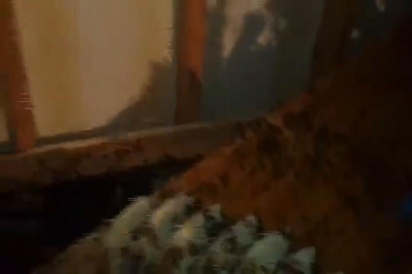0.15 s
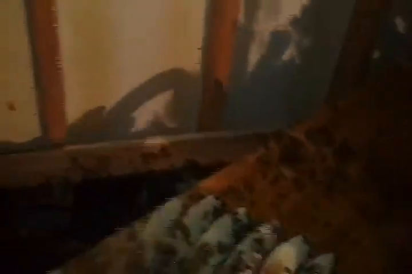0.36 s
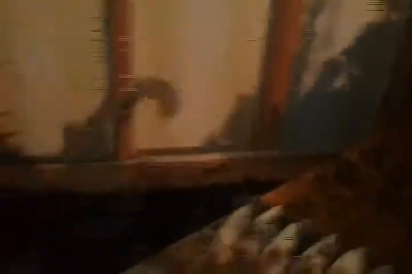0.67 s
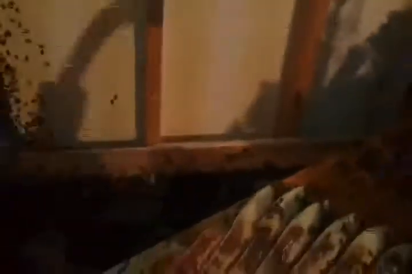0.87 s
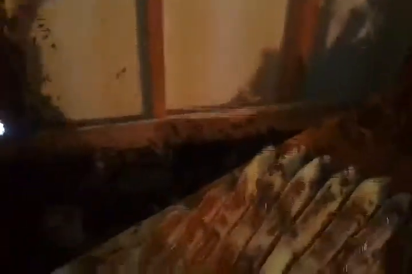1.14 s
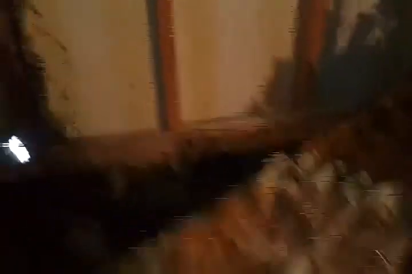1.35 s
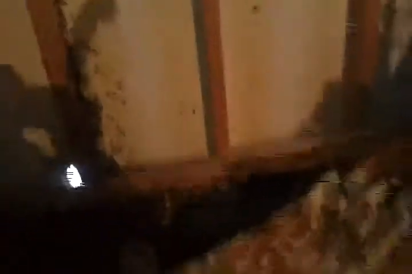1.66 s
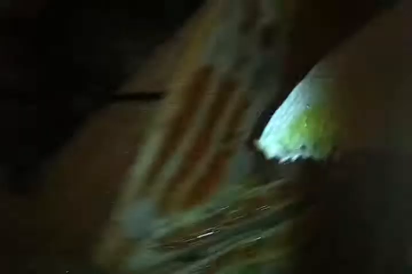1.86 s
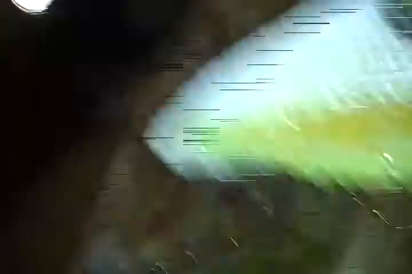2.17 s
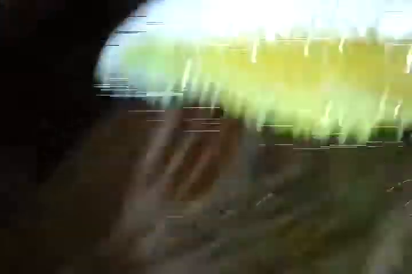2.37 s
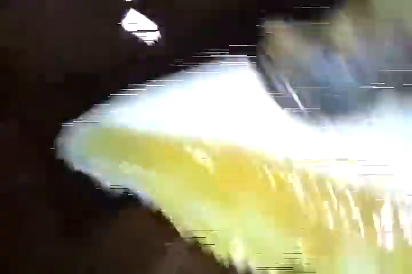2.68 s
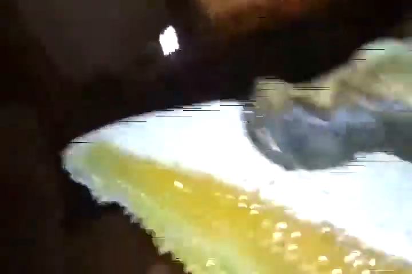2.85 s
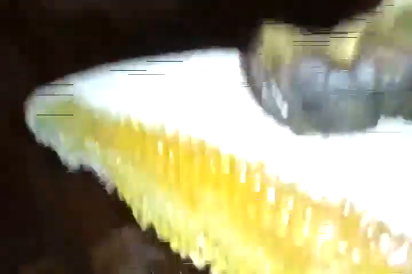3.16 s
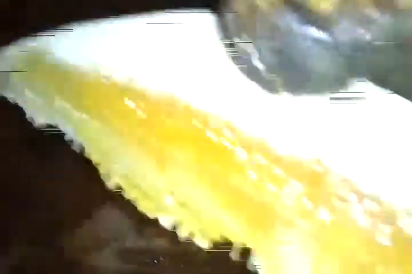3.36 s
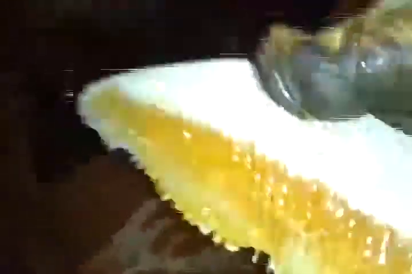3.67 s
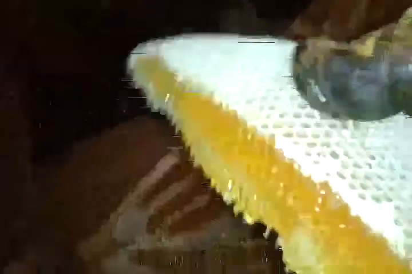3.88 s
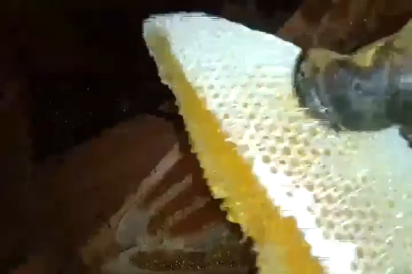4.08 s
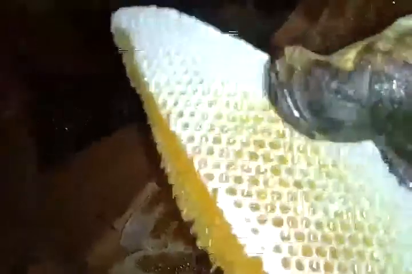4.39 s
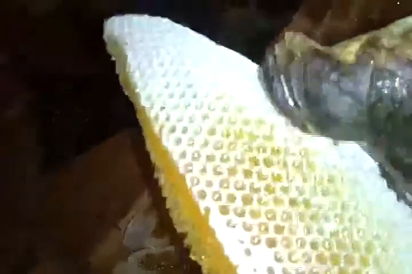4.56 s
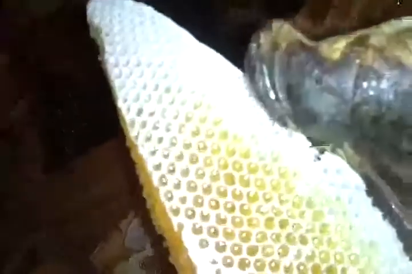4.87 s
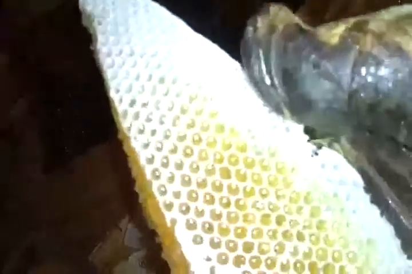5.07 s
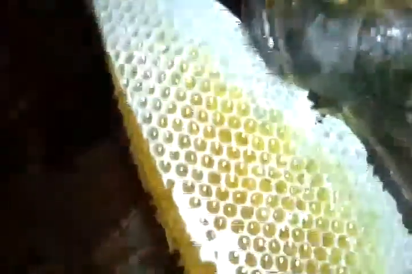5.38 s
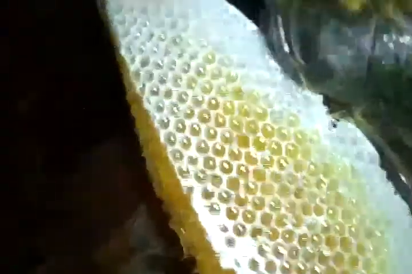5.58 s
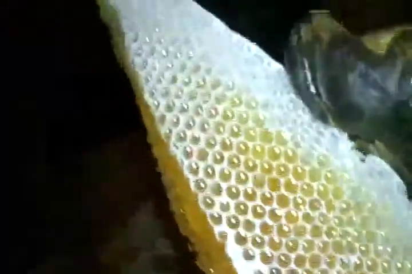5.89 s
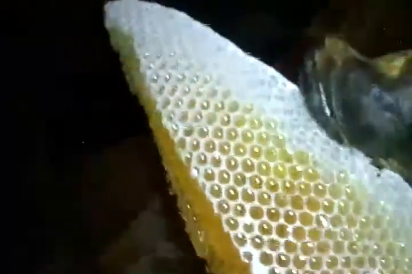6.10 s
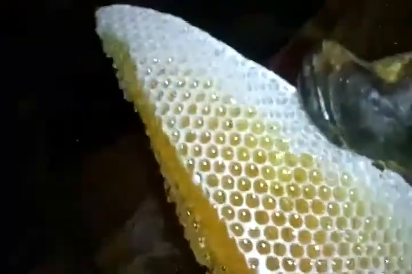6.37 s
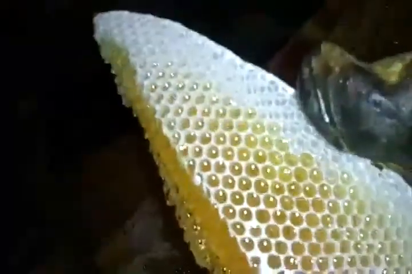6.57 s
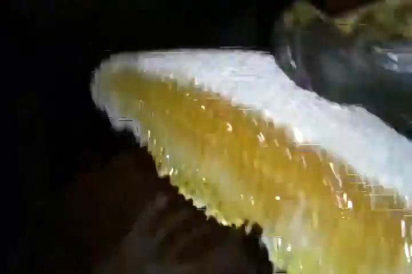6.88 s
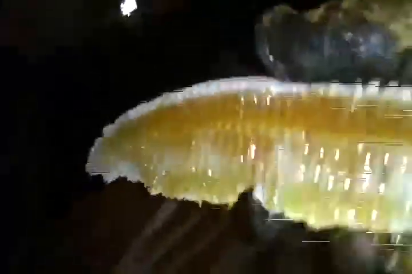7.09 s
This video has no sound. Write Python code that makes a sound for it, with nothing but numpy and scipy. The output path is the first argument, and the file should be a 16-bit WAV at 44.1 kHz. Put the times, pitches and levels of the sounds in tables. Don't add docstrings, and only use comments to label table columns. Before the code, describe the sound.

Loud rushing suction through a corrugated hose with brief whistles, a sudden silence, then steadier roar and motor whine, cut once for an instant.

```python
import sys
import numpy as np
from scipy import signal
from scipy.io import wavfile
from scipy.ndimage import uniform_filter1d

SR = 44100
rng = np.random.default_rng(int(sys.argv[2]) if len(sys.argv) > 2 else 0)


def waveform_to_disk(signal):
    frames = np.transpose(np.atleast_2d(signal))
    scaled = np.clip(frames, -1, 1) * 32767
    samples = np.round(scaled).astype(np.int16)
    wavfile.write(sys.argv[1], SR, samples)


def to_linear_factor(level_db):
    exponent = np.asarray(level_db, float) / 20
    return 10 ** exponent


N = 319267

MOVE_S = 2.3


def read(points, hz):
    f, value = np.transpose(points)
    return np.interp(np.log(hz + 1), np.log(f + 1), value)


def evened(x):
    return x / np.sqrt(np.mean(x ** 2) + 1e-20)


def drift(per_s):
    t = np.arange(0, N, 256) / SR
    rates = np.geomspace(per_s / 20, per_s, 16)
    slow = sum(np.sin(2 * np.pi * (f * t + rng.random())) / np.sqrt(f) for f in rates)
    return np.interp(np.arange(N) / SR, t, evened(slow))


def by_place(t, first, second):
    return np.where(t < MOVE_S, first, second)


def bell(t, middle_s, length_s):
    return np.exp(-((2 * (t - middle_s) / length_s) ** 2) ** 2)


def bump(hz, centre_hz, width_hz):
    return 1 / (1 + (2 * (hz[:, None] - centre_hz) / width_hz) ** 2)


# (frequency [Hz], width [Hz], early level over the rush [dB], late level [dB])
FIRST_HOSE = [(95, 14, -1.5, -4), (152, 25, -2, -0.5), (218, 25, 1.5, 3), (270, 17, 7, 1.5),
              (370, 55, 4.5, 1), (450, 50, -1, 0), (605, 30, 3, 1.5), (695, 22, 5, 0), (746, 30, -2, -3.5),
              (775, 25, 0, 2), (1120, 40, -3.5, -5.5), (1185, 19, 7, 0.5), (1250, 41, 0.5, -2.5),
              (1554, 110, 4, 4), (1910, 40, 1.5, 4), (2100, 120, -1, 1), (2300, 80, 5, 0.5),
              (2420, 60, -1, 1.5), (2480, 50, 1.5, 3), (2820, 150, 1, 1), (3100, 300, -7.5, -6),
              (3940, 170, 5.5, 5), (4100, 73, -1, -3.5), (4740, 220, -1.5, 0.5)]
SWING_S = 0.61, 1.1


def swinging_hose(t, hz):
    swung = np.interp(t, SWING_S, (0, 1))
    return sum(bump(hz, f, w) * (early + (late - early) * swung) for f, w, early, late in FIRST_HOSE)


def hose_moan(t, hz):
    moan_hz = 375 - 14 * np.cos(2 * np.pi * 4.3 * (t - .14))
    moan_db = np.interp(t, (.35, .65), (7.5, 0))
    return bump(hz, moan_hz, 28) * moan_db


# (middle [s], length [s], frequency [Hz], level over the rush [dB])
HOSE_WHISTLES = [
    (.42, .3, 2270, 4.5),
    (0.478, .15, 1570, 4.5),
    (0.759, .2, 3915, 4.5),
    (.85, .25, 2110, 4.5),
    (1.081, .15, 2420, 6.5),
    (1.217, .2, 2100, 5),
    (1.402, .2, 1890, 3),
    (1.551, .2, 2550, 7),
    (1.7, .3, 1587, 5),
    (1.78, .15, 1860, 4.5),
]


def hose_whistles(t, hz):
    return sum(bump(hz, f, 23) * db * bell(t, s, length) for s, length, f, db in HOSE_WHISTLES)


# (frequency [Hz], width [Hz], level over the rush [dB])
SECOND_HOSE = [(33, 12, 3.5), (61, 12, 3.5), (95, 20, -2.5), (211, 31, 4), (276, 36, -4.5), (330, 65, 4.5),
               (430, 21, -8), (442, 22, 3.5), (580, 30, 3), (625, 25, -2), (745, 32, -4.5), (812, 60, 2),
               (980, 70, -2.5), (1050, 27, 3), (1120, 47, -7), (1250, 60, -2.5), (1506, 40, 6),
               (1574, 30, 5), (1596, 33, -3), (1681, 37, 8), (1780, 40, 1.5), (1844, 55, -5), (1897, 32, 5),
               (2100, 50, -8), (2383, 27, -1), (2530, 350, 2.5), (3014, 160, -6), (3390, 60, 0.5),
               (3850, 400, 3.5), (6470, 340, 2.5)]


def resting_hose(hz):
    return sum(bump(hz, f, w) * db for f, w, db in SECOND_HOSE)


def colour(spectrum, hose_db, hz):
    comb = evened(uniform_filter1d(rng.standard_normal(len(hz)), size=3))
    gain = to_linear_factor((read(spectrum, hz) + 1.3 * comb)[:, None] + hose_db)
    middle_band = (hz > 600) & (hz < 3000)
    return gain / np.linalg.norm(gain[middle_band], axis=0)


# (frequency [Hz], density [dB per Hz])
FIRST_AIR = [(20, -10.5), (35, -12), (60, -12.5), (95, -17.5), (200, -16), (450, -19), (750, -24.5),
             (1200, -21), (2700, -20.5), (3400, -22.5), (5500, -25.5), (6700, -25.5), (7200, -33),
             (7600, -44.5)]
SECOND_AIR = [(20, -17), (35, -15), (60, -12.5), (95, -17.5), (200, -15.5), (450, -18), (750, -22.5),
              (1200, -22), (2700, -22.5), (3400, -24.5), (5500, -24.5), (6700, -25), (7200, -31.5),
              (7600, -42)]
RUSH_DB, RUMBLE_DB, HISS_DB = (-19.5, -21), (-6, -3.5), (-1.5, -2)
RUSH_GAIN_DB_PER_S = .5
GUST_DB, GUSTS_PER_S = 1.3, 6


def air():
    frames = N // 1024 + 5
    hz = np.fft.rfftfreq(4096, 1 / SR)
    t = np.arange(frames) * 1024 / SR
    real, imaginary, patches = rng.standard_normal((frames, 2049, 3)).T
    patches = uniform_filter1d(patches, size=28, axis=0)
    patches = evened(uniform_filter1d(patches, size=4, axis=1))

    rush_db = by_place(t, RUSH_DB[0] + RUSH_GAIN_DB_PER_S * (t - 1), RUSH_DB[1])
    gusts = np.interp(t, np.arange(N) / SR, drift(GUSTS_PER_S))
    rumble_db = by_place(t, *RUMBLE_DB) + GUST_DB * gusts
    hiss_db = by_place(t, *HISS_DB)
    low = 1 / (1 + (hz / 500) ** 4)
    high = 1 / (1 + (3000 / (hz + 1)) ** 8)
    tilt_db = np.outer(low, rumble_db + 2.0) + np.outer(high, hiss_db + 0.46)

    moving_db = swinging_hose(t, hz) + hose_moan(t, hz) + hose_whistles(t, hz)
    first = colour(FIRST_AIR, moving_db, hz)
    second = colour(SECOND_AIR, resting_hose(hz), hz)
    spectra = (real + 1j * imaginary) * by_place(t, first, second)
    spectra = spectra * to_linear_factor(rush_db + tilt_db + 0.71 * patches)
    rush = signal.istft(spectra, nperseg=4096, noverlap=3072)[1][:N]
    eddies = evened(uniform_filter1d(rng.standard_normal(N), size=300))
    return to_linear_factor(0.5) * to_linear_factor(0.35 * eddies) * rush


def tone(turns, db, waver_db, jitter):
    phase = turns + rng.random() + jitter * drift(15)
    return np.sqrt(2) * to_linear_factor(db + waver_db * drift(12)) * np.sin(2 * np.pi * phase)


WHISTLE_HZ = 177.5, 770, 2091, 3068, 5763
# (first place [dB], second place [dB])
WHISTLES = [
    (-36.5, -61),
    (-43, -62),
    (-58.5, -40.5),
    (-68, -42),
    (-68, -50.5),
]


def steady_whistles(t):
    return sum(tone(f * t, by_place(t, *db), 1.3, 0.04) for f, db in zip(WHISTLE_HZ, WHISTLES))


def mains_hum(t, mains, turns):
    hum = tone(mains, by_place(t, -30.5, -32), 1.8, 0.024)
    return hum + tone(2 * turns + mains, by_place(t, -55, -44), 1.5, .04)


# (shaft multiple, middle [s], length [s], lift [dB])
GLINTS = [(7, 1.5, .55, 6), (7, 1.56, .16, 5), (7, .85, .7, -4), (4, .3, .7, -5), (3, 3.6, 1.4, -3),
          (7, 2.65, .3, 7), (7, 5.3, .4, 3), (7, 6.6, .7, -2), (12, 2.85, .8, -9), (12, 6.6, .6, 2.5),
          (9, 1.55, .6, 5), (9, .5, 0.5, -5), (9, 3.6, .5, 8.5), (3, 2.1, .4, 7), (2, 3.8, .3, 2.5),
          (4, 3.7, .4, 4)]


def glint(k, t):
    return sum(db * bell(t, s, length) for order, s, length, db in GLINTS if round(order) == k)


# (shaft multiple, first place [dB], second place [dB])
WEAK_ORDERS = [(.25, -76.5, -35), (.375, -73, -37.5), (2, -35.5, -41), (3, -39.5, -38), (4, -35, -38),
               (5, -39, -46.5), (6, -46, -57.5), (8, -57, -41), (9, -40.5, -47), (11, -48, -41.5),
               (13, -64, -52.5), (14, -53, -69.5)]


def weak_orders(t, turns):
    out = np.zeros(N)
    for k, first_db, second_db in WEAK_ORDERS:
        order_db = by_place(t, first_db, second_db) + glint(round(k), t) - 1.5
        out += tone(k * turns, order_db, 3.0, 0.05)
    return out


def blade_orders(t, turns):
    seventh_db = by_place(t, -36, -35) + glint(7, t)
    twelfth_db = by_place(t, -42.5, -35.5) + glint(12, t)
    return tone(7 * turns, seventh_db, 1.7, 0.031) + tone(12 * turns, twelfth_db, 1.5, .04)


# (time [s], level [dB])
FACING = [(0, -32), (.45, -30.5), (.75, -25.5), (1.6, -23.5), (1.8, -28), (2.65, -28.5), (2.95, -23.5),
          (3.4, -27.5), (4.3, -28.5), (4.8, -26.5), (5.9, -29), (6.4, -25.5), (6.8, -27), (7.24, -28.5)]


def shaft_tone(t, mains, turns):
    shaft_db = np.interp(t, *np.transpose(FACING))
    return tone(turns, shaft_db, .8, 0.022) * (1 + 0.095 * np.sin(2 * np.pi * mains))


SHAFT_HZ = 530.2, 538.8
MAINS_HZ = 119.9


def motor():
    t = np.arange(N) / SR
    turns = np.cumsum(by_place(t, *SHAFT_HZ) + .15 * drift(1.5)) / SR
    mains = MAINS_HZ * t
    out = steady_whistles(t) + mains_hum(t, mains, turns)
    out += weak_orders(t, turns) + blade_orders(t, turns)
    return out + shaft_tone(t, mains, turns)


def scene():
    return (air() + motor())[None]


RAIL, OFFSET = .715, -.278


def overload(dry):
    room = np.where(dry < 0, RAIL + OFFSET, .62)
    return dry / (1 + (dry / room) ** 6) ** (1 / 6)


FADE_OUT_S, FADE_IN_S, FADE_IN_FROM = (1.832, 1.8755), (2.6532, 2.9), .19
FADE_OUT_BEND = 0.97
DROPOUT_S = 4.3713, 4.4723


def fader(t):
    fade_out = np.interp(t, FADE_OUT_S, (1, 0)) ** FADE_OUT_BEND
    fade_in = (t > FADE_IN_S[0]) * np.interp(t, FADE_IN_S, (FADE_IN_FROM, 1))
    return (fade_out + fade_in) * ((t < DROPOUT_S[0]) | (t > DROPOUT_S[1]))


# (frequency [Hz], level [dB])
MIRROR = [
    (7700, -6.5),
    (8300, -12.5),
    (8600, -28.5),
    (8900, -37.5),
    (9200, -57),
    (9500, -110),
]
SAMPLE_HZ = 16000


def low_rate(faded, gain, t):
    sampled = faded * (1 + 2 * np.cos(2 * np.pi * SAMPLE_HZ * t)) + OFFSET * gain
    hz = np.linspace(0, SR / 2, 513)
    taps = signal.firwin2(401, hz, to_linear_factor(read(MIRROR, hz)), fs=SR, window=("kaiser", 8))
    held = np.pad(sampled, ((0, 0), (200, 200)), "edge")
    return signal.oaconvolve(held, taps[None] / taps.sum(), "valid")


# (time [s], peak level [dB])
RAIL_CLICKS = [(1.2311, -52.5), (1.3234, -46), (1.4831, -46), (1.5215, -46), (1.766, -48.5), (3.255, -54),
               (3.914, -44), (4.1106, -60), (4.2697, -48.5), (4.5618, -50), (5.1547, -53.5), (5.2804, -51),
               (5.421, -55), (5.8525, -46), (6.2657, -46.5), (6.7716, -48)]


def rail_clicks():
    tips = np.zeros(N)
    s, db = np.transpose(RAIL_CLICKS)
    tips[np.round(s * SR).astype(int)] = to_linear_factor(db + 13.5)
    return tips


def low_pass(x):
    return signal.sosfilt(signal.butter(12, 15830, fs=SR, output="sos"), x)


def record(dry):
    t = np.arange(N) / SR
    gain = fader(t)
    band = signal.firwin(1023, 7600, window=("kaiser", 9), fs=SR)
    limited = signal.oaconvolve(overload(dry), band[None], "same")
    faded = (limited - limited.mean()) * gain
    mix = low_rate(faded, gain, t) + rail_clicks()
    return low_pass(mix)


dry = scene()
out = record(dry)
waveform_to_disk(out)
```